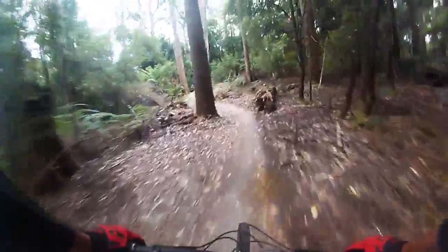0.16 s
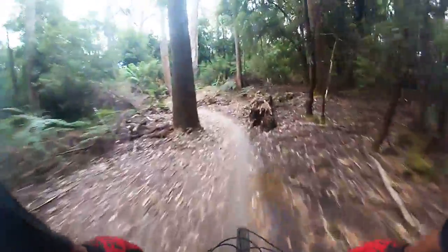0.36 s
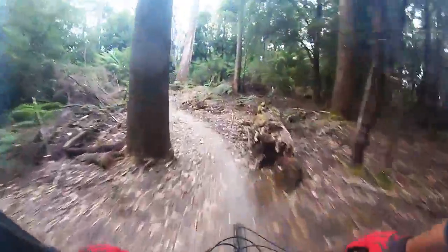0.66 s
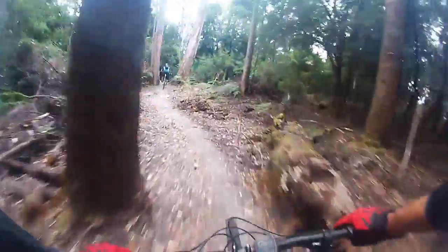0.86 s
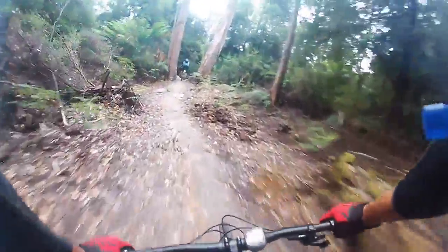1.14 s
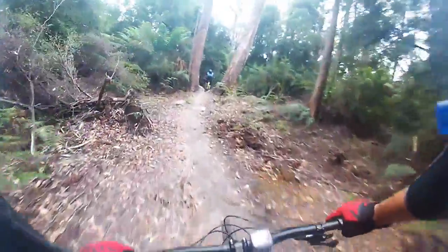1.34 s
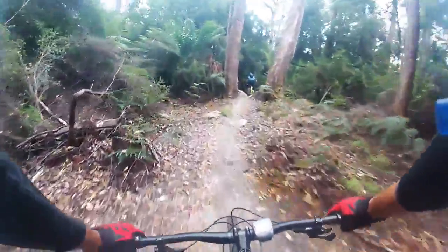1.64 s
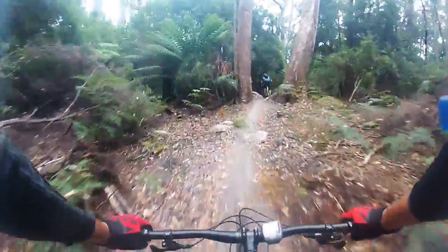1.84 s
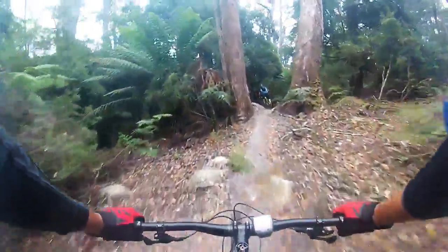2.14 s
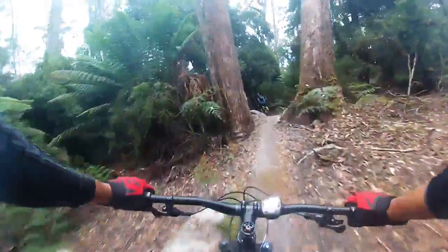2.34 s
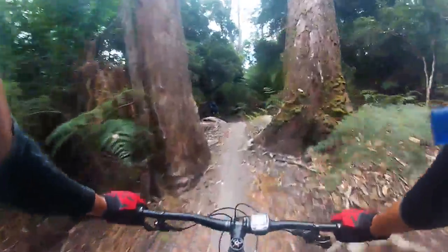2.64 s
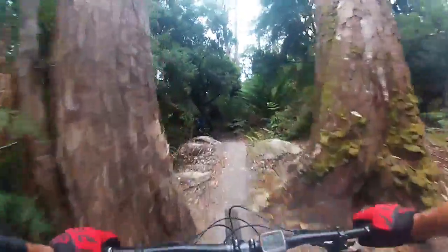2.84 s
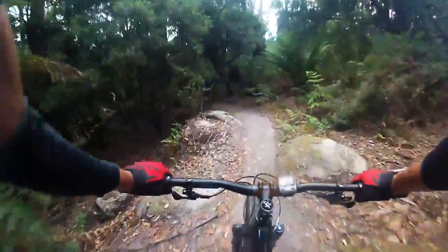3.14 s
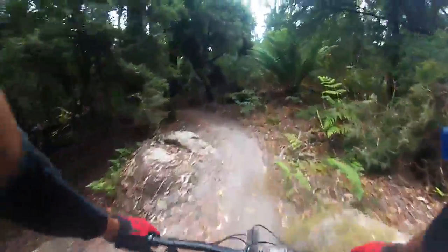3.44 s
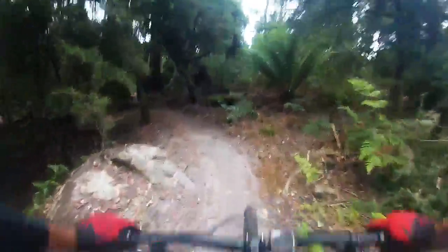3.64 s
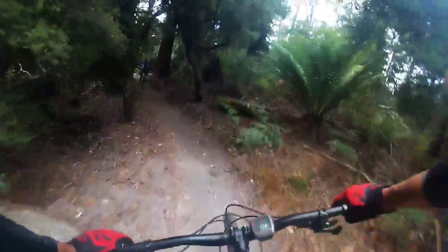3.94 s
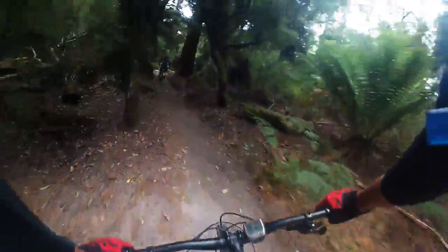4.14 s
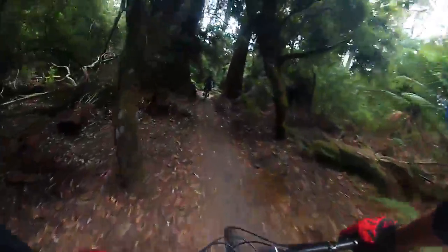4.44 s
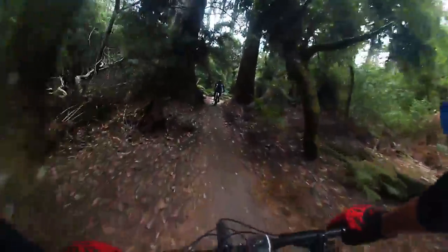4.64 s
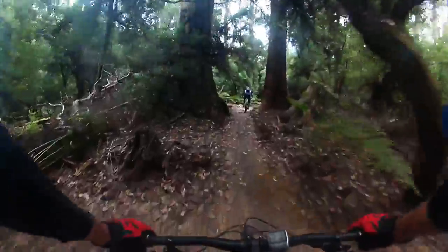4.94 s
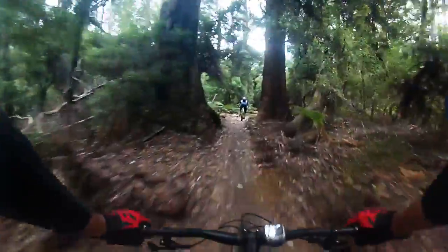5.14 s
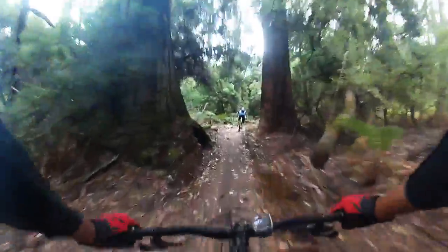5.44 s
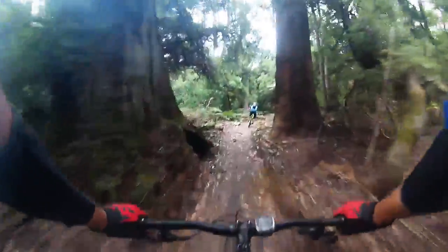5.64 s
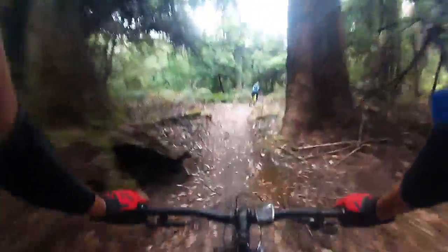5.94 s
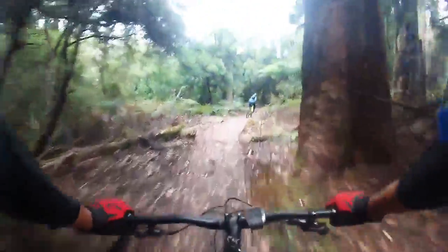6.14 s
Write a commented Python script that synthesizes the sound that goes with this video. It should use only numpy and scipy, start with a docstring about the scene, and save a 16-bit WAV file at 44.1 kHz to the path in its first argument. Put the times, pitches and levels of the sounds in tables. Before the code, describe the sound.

A bike runs down a forest dirt trail, picked up close by a closed-in chest microphone. Uneven tyre crunch and deep body sway continue throughout over faint electronic hiss, with heartbeat thumps under three per second. Grit taps lightly on the casing, with a few tiny squeaks. A single loud plasticky knock bursts out after halfway, ducking everything briefly; low bumps and a duller knock close it.

```python
"""A mountain bike runs down a forest dirt trail, heard from a sealed camera strapped to the rider's chest.
From the start, shaped noise and clicks make tyre roll, grit and ground rumble, over faint circuit hiss and tones.
Short sinking thumps make the heartbeat; ringing pitches make the grit taps, ticks, squeaks and faint pings.
After 3 s come smooth jolts of pressure, then scrapes and one hard knock at 3.75 s: the gain ducks and recovers.
Near the end more jolts gather around a smaller knock."""
import sys
import numpy as np
from scipy import signal
from scipy.fft import rfft, irfft, next_fast_len
from scipy.io import wavfile

SR = 44100
rng = np.random.default_rng(int(sys.argv[2]) if len(sys.argv) > 2 else 0)


def boost_factor(decibels):
    """Convert a level in decibels to a linear amplitude factor."""
    exponent = np.asarray(decibels, float) / 20
    return 10 ** exponent


def unload_audio(sound):
    """Save the sound as a 16-bit wav file, at the path given as the first command line argument."""
    columns = np.transpose(np.atleast_2d(sound))
    # keep every value between -1 and 1, then stretch to whole-number steps
    steps = np.round(np.clip(columns, -1, 1) * 32767)
    wavfile.write(sys.argv[1], SR, steps.astype(np.int16))


N = 277256

# Circuit hiss. Each row: pitch in Hz, relative level in dB per Hz.
HISS_SPECTRUM = [(4120, -10), (7000, -3), (8620, -6), (10100, -2.5), (10900, -18), (11000, -7.5),
                 (14500, -6), (15000, -8)]
# Thin circuit tones. Each row: pitch in Hz, rms level in dB.
CIRCUIT_TONES = [(6955, -82), (7014, -83), (10427, -86), (10492, -85), (11746, -91), (13964, -91)]
# Thin squeaks, perhaps rubber or a cable rubbing. Each row: start in seconds, length in seconds,
# level in dB before the flutter, pitch in Hz.
SQUEAKS = [(.27, .1, -58, 2130), (.52, .15, -73, 5030), (.73, .21, -73, 5030), (4.35, .09, -58, 2050)]
# Faint pings from the frame. Each row: start in seconds, peak in dB, contact length in seconds.
PINGS = [(1.955, -57, 0.012), (2.1, -58, 0.008), (5.72, -61, 0.0075)]
# Pitch of the frame. Each row: pitch in Hz, relative level in dB, time to fall by 60 dB in seconds.
FRAME_MODES = [(897, 0, 0.1)]
# Grit tapping the housing. Each row: start in seconds, peak in dB before the band filter.
TAPS = [(0.192, -37), (0.2284, -31), (0.415, -37), (0.6564, -40), (0.7118, -40), (0.7352, -41),
        (0.7996, -42), (1.3828, -34), (1.7589, -40), (2.3865, -40), (2.4548, -39), (2.7886, -41),
        (2.8749, -34), (3.0041, -38), (3.2894, -39), (3.3238, -41), (3.3742, -36), (3.6287, -36),
        (3.6845, -36), (3.92, -38), (4.0886, -40), (5.3931, -41)]
# Light contacts move the housing only within this band: lower edge in Hz, upper edge in Hz.
LIGHT_BAND_HZ = [1100, 2900]
# Grit scraping the housing just before the hard knock. Each row: start in seconds, peak in dB,
# contact length in seconds.
SCRAPES = [(3.7262, -22, .004), (3.7415, -28, .003)]
# Pitches of the housing. Each row: pitch in Hz, relative level in dB, time to fall by 60 dB in seconds.
HOUSING_MODES = [(1055, -16.5, 0.015), (1480, -2.5, 0.013), (2066, -4.5, 0.017), (2500, -46, 0.005),
                 (2980, -29, 0.003), (3330, -17.5, 0.01)]
# Small hard ticks. Each row: start in seconds, peak in dB, contact length in seconds.
TICKS = [(0.027, -48, 0.0025), (0.5032, -44, 0.0015), (0.524, -46, 0.0027), (0.631, -47.5, 0.0021),
         (1.0953, -48, 0.0025), (1.7568, -44.5, 0.0036), (3.027, -46.5, 0.0023), (3.0788, -52, 0.0026),
         (3.154, -47, 0.003), (3.3727, -35.5, 0.0015), (3.6276, -34, 0.0048), (3.7258, -33.5, 0.0096),
         (3.748, -23.5, .003), (3.7967, -45, 0.003), (4.7858, -33, 0.00055), (5.222, -42, 0.004),
         (5.29, -52, 0.003), (5.34, -47, 0.0041), (5.397, -48, 0.0056), (5.517, -48, 0.0039),
         (5.843, -47, 0.0048), (6.002, -41.5, 0.0047)]
# Pitches of the ticks. Each row: pitch in Hz, relative level in dB, time to fall by 60 dB in seconds.
TICK_MODES = [(4080, -23, 0.0019), (4870, -5, 0.012), (5794, 9.5, 0.0057), (6410, 1, 0.017),
              (7650, -2.5, 0.0042), (9250, -9, 0.0063), (11500, -19, .004), (13140, -19, 0.0052)]
# Tyres on dirt and leaves. Each row: time in seconds, roll in dB before the split, grit hiss in dB.
TREAD_LEVELS = [(0.0, -57, -65), (0.13, -58.5, -61.5), (0.31, -50, -61.5), (0.55, -55.5, -61.5),
                (0.75, -58, -64.5), (0.87, -56, -62), (1.01, -62, -65), (1.1, -53.5, -61.5),
                (1.22, -55.5, -61), (1.38, -54, -62), (1.43, -58, -63), (1.6, -56.5, -64),
                (1.75, -56, -63.5), (2.14, -59.5, -63), (2.4, -53, -64), (2.58, -57, -64),
                (2.89, -50.5, -62), (3.05, -55, -63), (3.1, -60.5, -65.5), (3.24, -54.5, -63.5),
                (3.46, -60.5, -65.5), (3.52, -53.5, -64), (3.72, -53.5, -60.5), (3.93, -57, -64.5),
                (4.12, -56, -60), (4.16, -62, -63), (4.2, -53.5, -63), (4.28, -57, -61.5), (4.42, -54, -62),
                (4.58, -55, -61), (4.85, -57.5, -62), (5.02, -59.5, -63.5), (5.35, -57.5, -62.5),
                (5.41, -51.5, -62), (5.47, -59.5, -63.5), (5.84, -59.5, -66.5), (5.97, -53, -60.5),
                (6.05, -56.5, -64), (6.27, -54, -61)]
# Tyre roll. Each row: pitch in Hz, relative level in dB per Hz.
ROLL_SPECTRUM = [(410, -20), (700, -14), (844, -38), (898, -10.5), (968, -19.5), (1190, -10.5), (1300, 0),
                 (1430, 3.5), (1570, -2), (1720, -12), (2000, -3), (2260, 0), (2970, -19), (3100, -16.5),
                 (4030, -25), (6820, -120)]
# Gain of the roll above the split. Each row: time in seconds, gain in dB.
UPPER_ROLL = [(0, 6), (.3, -1.5), (.55, -2), (1.3, 2), (2.2, -2), (2.9, -0.5), (3.6, 2.5), (4.4, 2.5),
              (4.9, -0.5), (5.4, -3), (6.0, 3), (6.27, -1)]
# Grit hiss. Each row: pitch in Hz, relative level in dB per Hz.
GRIT_SPECTRUM = [(1710, 1), (2900, -3.5), (3000, -8), (3470, 1), (3830, -8), (4170, -3.5), (4510, -6.5),
                 (4870, 0.5), (5270, -5), (5760, 1.5), (6060, -2.5), (7200, -7.5), (8510, -13),
                 (10100, -14), (11000, -13), (14300, -28), (22000, -120)]
# The body. Each row: time in seconds, slow sway in dB, ground rumble in dB.
RIDE_LEVELS = [(0.0, -25, -43), (0.3, -39.5, -45.5), (0.86, -34, -47), (1.29, -35.5, -46.5),
               (1.8, -30, -44.5), (2.17, -36, -43.5), (2.55, -30.5, -45), (2.8, -31.5, -45),
               (3.1, -29.5, -49), (3.42, -29.5, -47), (3.6, -28.5, -44.5), (3.71, -28.5, -36.5),
               (3.93, -33, -39.5), (4.1, -28.5, -48), (4.29, -35, -44), (4.68, -32, -45.5),
               (4.78, -29.5, -49.5), (5.0, -28.5, -48), (5.26, -35.5, -47.5), (5.7, -27, -44.5),
               (5.91, -26, -44.5), (6.0, -23, -36), (6.04, -26, -43), (6.22, -22, -46)]
# Slow sway. Each row: pitch in Hz, relative level in dB per Hz.
SWAY_SPECTRUM = [(6, -6), (11, 0), (22, 1.5), (30, -14.5), (40, -20), (60, -49)]
# Ground rumble. Each row: pitch in Hz, relative level in dB per Hz.
RUMBLE_SPECTRUM = [(22, -61), (38, 0), (59, -3.5), (102, -4.5), (204, -23), (284, -24), (389, -28.5),
                   (579, -30), (637, -33.5), (884, -35), (1000, -32.5), (1300, -32.5), (2200, -120)]
# Heartbeats. Each row: time in seconds, level in dB.
HEARTBEATS = [(0.307, -21.5), (0.681, -21), (1.058, -23), (1.441, -22), (1.824, -22), (2.201, -18.5),
              (2.579, -20.5), (2.958, -23), (3.338, -18.5), (4.093, -21), (4.472, -23), (4.845, -24.5),
              (5.227, -22), (5.616, -21.5), (5.979, -24.5)]
# Jolts that press the camera into the chest or pull it away. Each row: middle in seconds,
# signed height, width (standard deviation) in seconds.
JOLTS = [(3.267, -0.083, 0.0043), (3.454, -0.11, 0.0042), (3.563, 0.1, 0.0034), (3.584, 0.11, 0.0033),
         (3.653, -0.11, 0.0018), (3.731, 0.41, 0.0047), (3.71, 0.046, 0.018), (3.919, -0.19, 0.0045),
         (5.584, 0.098, 0.0084), (5.779, -0.089, 0.0039), (5.902, -0.17, 0.0042), (5.947, 0.11, 0.0077),
         (5.975, -0.28, 0.0024), (6.001, 0.24, 0.0068), (6.024, -0.062, 0.0049), (6.104, 0.13, 0.0063),
         (6.186, -0.077, 0.012), (6.215, 0.039, 0.0091), (6.258, 0.05, 0.016)]
# Knocks on the housing. Each row: start in seconds, signed step factor, step decay in seconds,
# ring in dB, brightness in dB per octave, mount thud in dB (all before the treble is filtered off).
KNOCKS = [(3.7476, -3.5, 0.0099, -7, 8, -13), (5.9792, 3.2, 0.00073, -25, -21, -22.5)]


def rms_one(x):
    """Scale x to rms 1."""
    return x / np.sqrt(np.mean(x ** 2) + 1e-20)


def drift(rate_hz):
    """Random wander of spread 1: noise twice through a one-pole low-pass."""
    r = np.exp(-2 * np.pi * rate_hz / SR)
    noise = rng.standard_normal(N + SR)
    wander = signal.lfilter([1], [1, -2 * r, r * r], noise)
    return rms_one(wander[SR:])  # the first second only settles the filter


def in_time(rows):
    """Read each column of a table at every sample."""
    s, *columns = np.transpose(rows)
    return [np.interp(np.arange(N) / SR, s, column) for column in columns]


def colour(x, spectrum):
    """Shape x by a spectrum table, as good as silent outside it; rms 1."""
    hz, db = np.transpose(spectrum)
    size = next_fast_len(N)
    log_hz = np.log(np.arange(size // 2 + 1) * SR / size + 1e-3)
    gain = boost_factor(np.interp(log_hz, np.log(hz), db, -200, -200))
    return rms_one(irfft(rfft(x, size) * gain, size)[:N])


def grains(per_s, spread_db):
    """Random clicks of random sign, a few much bigger than the rest."""
    size_db = spread_db * np.minimum(rng.exponential(1, N), 5)
    sizes = boost_factor(size_db) * rng.choice([-1, 1], N)
    return rms_one(sizes * (rng.random(N) < per_s / SR))


def rolling(spectrum, grain_share, per_s, spread_db, bumps_db, own_db, own_hz):
    """Noise and grains of the ground contact; shared bumps and a flicker of its own move the level."""
    source = rng.standard_normal(N) + grain_share * grains(per_s, spread_db)
    level_db = bumps_db + own_db * drift(own_hz)
    return colour(source * boost_factor(level_db), spectrum)


def ring(push, hz, t60):
    """A resonance: a unit click sets a sine of about height 1 ringing, 60 dB down after t60 seconds."""
    r, w = boost_factor(-60 / (t60 * SR)), 2 * np.pi * hz / SR
    return signal.lfilter([0, np.sin(w)], [1, -2 * r * np.cos(w), r * r], push + 1e-18)


def strike(events, modes):
    """A contact is a short rattle of tiny touches; it drives every mode with a strength of its own."""
    t, out = np.arange(SR // 20) / SR, np.zeros(N + SR)
    for s, peak_db, contact_s in events:
        shape = (1 - np.exp(-t / 0.0012)) * np.exp(-t / contact_s)
        touches = rng.standard_normal(len(t)) * shape
        rattle = np.r_[touches, np.zeros(SR // 5)]  # room to ring on
        sound = np.zeros(len(rattle))
        for hz, db, t60 in modes:
            scatter_db = 2 * rng.standard_normal()
            sound += boost_factor(db + scatter_db) * ring(rattle, hz, t60)
        start = int(s * SR)
        out[start:start + len(sound)] += boost_factor(peak_db) * sound / np.abs(sound).max()
    return out[:N]


def circuit(flicker_db, waver_rad):
    """Hiss that flickers a little and thin tones that waver in phase."""
    t, tones = np.arange(N) / SR, np.zeros(N)
    for hz, db in CIRCUIT_TONES:
        phase = 2 * np.pi * hz * t + waver_rad * drift(3.8)
        tones += np.sqrt(2) * boost_factor(db) * np.sin(phase)
    hiss = colour(rng.standard_normal(N), HISS_SPECTRUM)
    return boost_factor(-71 + flicker_db * drift(12)) * hiss + tones


def squeaks(width_hz, fade_s):
    """Noise twice through a narrow resonance, fluttering; each squeak fades in, holds and fades out."""
    t, out = np.arange(N) / SR, np.zeros(N)
    t60 = np.log(1000) / (np.pi * width_hz)
    noise, flutter = rng.standard_normal(N), boost_factor(3 * drift(35))
    for s, length, db, hz in SQUEAKS:
        shape = np.clip(np.minimum(t - s, s + length - t) / fade_s, 0, 1)
        tone = rms_one(ring(ring(noise, hz, t60), hz, t60))
        out += boost_factor(db) * shape * tone
    return out * flutter


def pings():
    """Faint contacts ring the frame at its one pitch."""
    return strike(PINGS, FRAME_MODES)


def housing_contacts(tap_contact_s):
    """Grit taps and scrapes ring the housing; the taps are kept within a narrow band."""
    events = [(s, db, tap_contact_s) for s, db in TAPS]
    light_band = signal.butter(3, LIGHT_BAND_HZ, "band", fs=SR, output="sos")
    taps = signal.sosfilt(light_band, strike(events, HOUSING_MODES))
    return taps + strike(SCRAPES, HOUSING_MODES)


def ticks():
    """Small hard contacts ring at high pitches."""
    return strike(TICKS, TICK_MODES)


def tilt(x, upper_db, split_hz):
    """Change the level of the part of x above the split."""
    high_pass = signal.butter(4, split_hz, "high", fs=SR, output="sos")
    return x + (boost_factor(upper_db) - 1) * signal.sosfiltfilt(high_pass, x)


def tyres(bumps):
    """Tread on dirt: lower roll and higher grit hiss share the slow bumps and a faster crunch."""
    roll_db, grit_db = in_time(TREAD_LEVELS)
    upper_db, = in_time(UPPER_ROLL)
    crunch = drift(17.7)
    roll = rolling(ROLL_SPECTRUM, 0.57, 400, 2.9, 0.36 * bumps + 1.38 * crunch, 1.22, 34)
    roll = tilt(roll, upper_db, split_hz=1750)
    grit = rolling(GRIT_SPECTRUM, 0.73, 900, 3.4, 0.47 * bumps + 0.37 * crunch, 1.6, 36)
    return boost_factor(roll_db) * roll + boost_factor(grit_db) * grit


def sway_and_rumble(bumps):
    """Very low noise of the swaying body, and ground rumble that moves with the bumps."""
    sway_db, rumble_db = in_time(RIDE_LEVELS)
    sway = colour(rng.standard_normal(N), SWAY_SPECTRUM)
    rumble = rolling(RUMBLE_SPECTRUM, 0, 100, 3, 0.22 * bumps, 1.9, 3.5)  # no grains
    return boost_factor(sway_db) * sway + boost_factor(rumble_db) * rumble


def heart(start_hz, end_hz, fall_s, lead_s, swell_s):
    """Each beat is a short thump whose pitch sinks: a dip, a crest, a slower dip."""
    t = np.arange(SR // 5) / SR
    pitch_hz = end_hz + (start_hz - end_hz) * np.exp(-t / fall_s)
    phase = 2 * np.pi * np.cumsum(pitch_hz) / SR
    thump = -np.sin(phase) * t / swell_s * np.exp(1 - t / swell_s)
    clicks = np.zeros(N)
    for s, level_db in HEARTBEATS:
        clicks[int((s - lead_s) * SR)] = boost_factor(level_db)  # the thump starts a little ahead
    return signal.fftconvolve(clicks, thump)[:N]


def jolts():
    """Smooth single pushes of pressure on the sealed microphone."""
    t = np.arange(N) / SR
    return sum(height * np.exp(-((t - s) / width) ** 2 / 2) for s, height, width in JOLTS)


def knocks(rise_s, contact_hz):
    """A pressure step leaks away while housing and mount ring; the blunt contact drives little treble."""
    t, out = np.arange(N) / SR, np.zeros(N)
    for s, height, decay_s, ring_db, tilt_db, thud_db in KNOCKS:
        since = np.maximum(t - s, 0)
        out += height * (1 - np.exp(-(since / rise_s) ** 2)) * np.exp(-since / decay_s)
        click = np.zeros(N)
        click[int(s * SR)] = 1
        for hz, db, t60 in HOUSING_MODES:
            bright_db = tilt_db * np.log2(hz / 1420)
            out += boost_factor(ring_db + db + bright_db) * ring(click, hz, t60)
        out += boost_factor(thud_db) * ring(click, hz=524, t60=0.019)  # the mount
    low_pass = signal.butter(6, contact_hz, fs=SR, output="sos")
    return signal.sosfilt(low_pass, out)


def scene():
    """Circuit, light contacts, tread, body and knocks summed at the one microphone."""
    bumps = drift(1.6)  # shared by tyres and rumble
    mix = circuit(flicker_db=2.6, waver_rad=0.93)
    mix += squeaks(width_hz=110, fade_s=0.02) + pings()
    mix += housing_contacts(tap_contact_s=0.0021) + ticks()
    mix += tyres(bumps)
    mix += sway_and_rumble(bumps)
    mix += heart(start_hz=59.3, end_hz=25.5, fall_s=0.023, lead_s=0.0044, swell_s=0.0091)
    mix += jolts()
    mix += knocks(rise_s=0.0028, contact_hz=2220)
    return mix[None]


def band_limit(x):
    """A steep low-pass at the top of the band."""
    return signal.sosfilt(signal.butter(12, 15190, fs=SR, output="sos"), x)


def record(dry):
    """Gain control: peaks over a threshold pull the gain down fast, and it climbs back at a steady rate."""
    threshold_db, release_db_per_s, attack_s = -10, 121, 0.004
    climb_db = release_db_per_s * np.arange(N) / SR
    over_db = np.maximum(20 * np.log10(np.abs(dry) + 1e-9) - threshold_db, 0)
    # hold the highest peak so far, less the climb since then
    held_db = np.maximum.accumulate(over_db + climb_db, axis=1) - climb_db
    held_db = np.maximum(held_db, 0)
    r = np.exp(-1 / (attack_s * SR))
    duck_db = signal.lfilter([1 - r], [1, -r], held_db)
    ducked = dry * boost_factor(-duck_db)
    finished = 0.94 * np.tanh(ducked / 0.88)  # soft clipping
    return band_limit(finished)


dry = scene()
out = record(dry)
unload_audio(out)
```